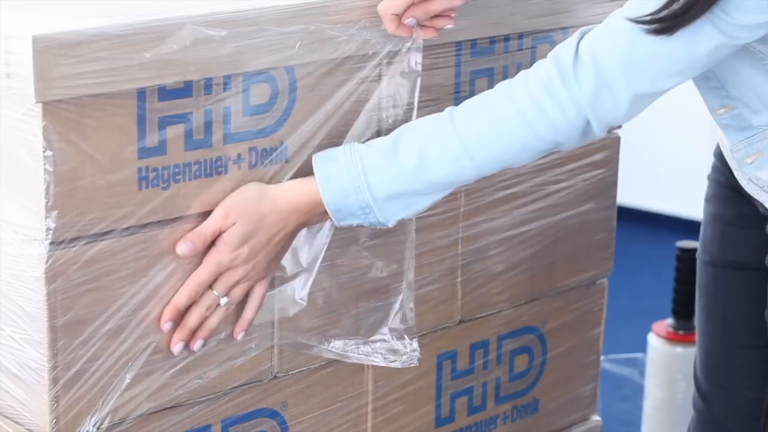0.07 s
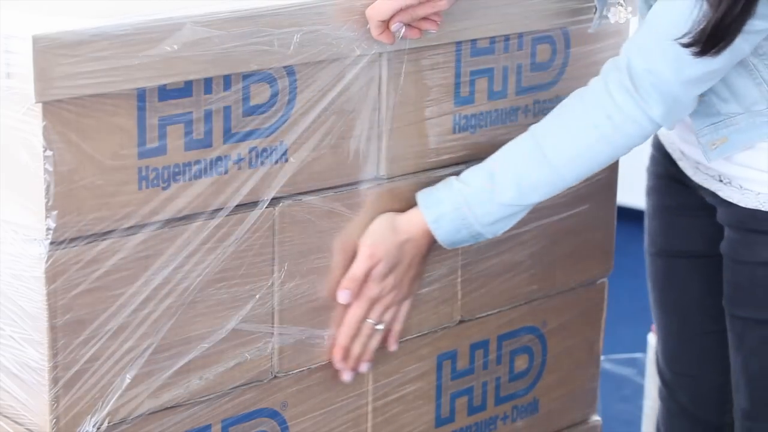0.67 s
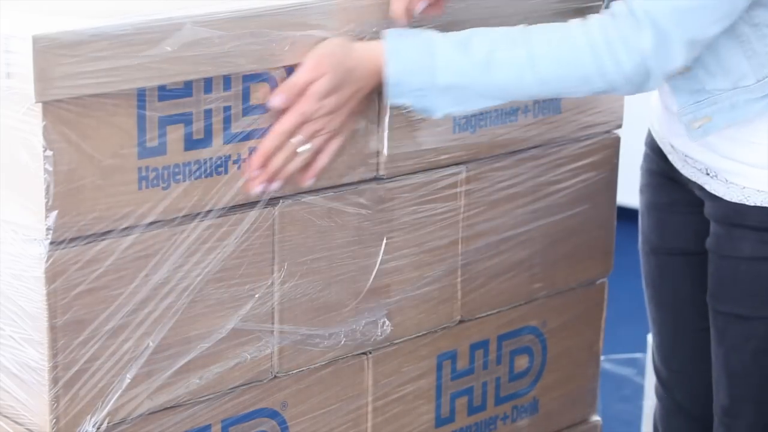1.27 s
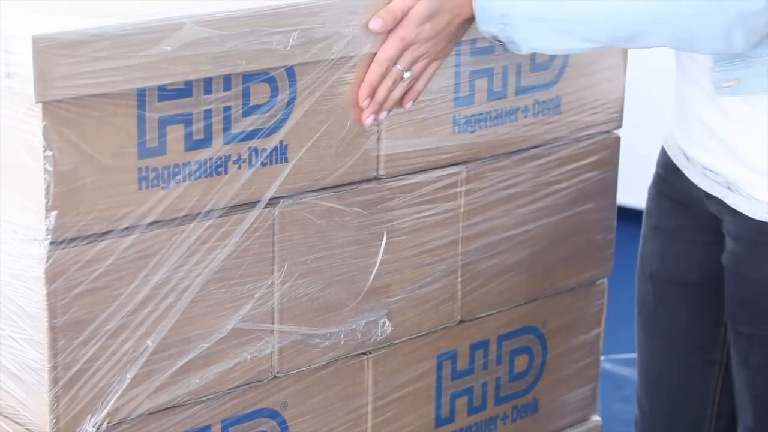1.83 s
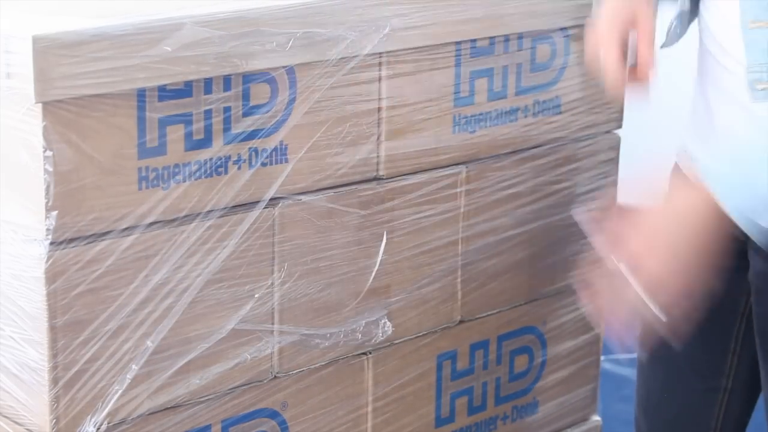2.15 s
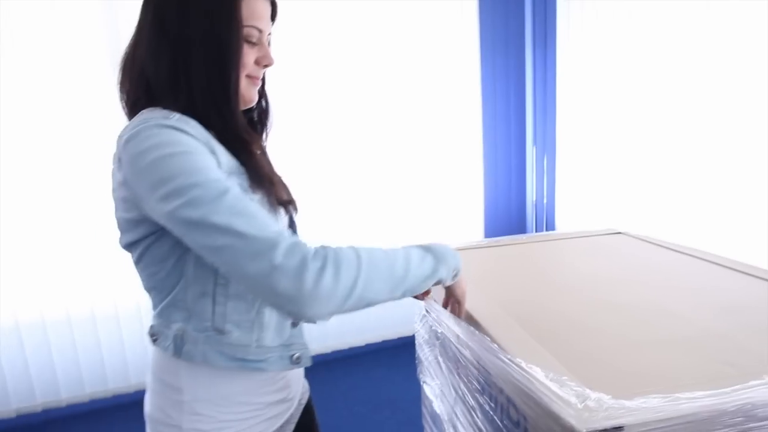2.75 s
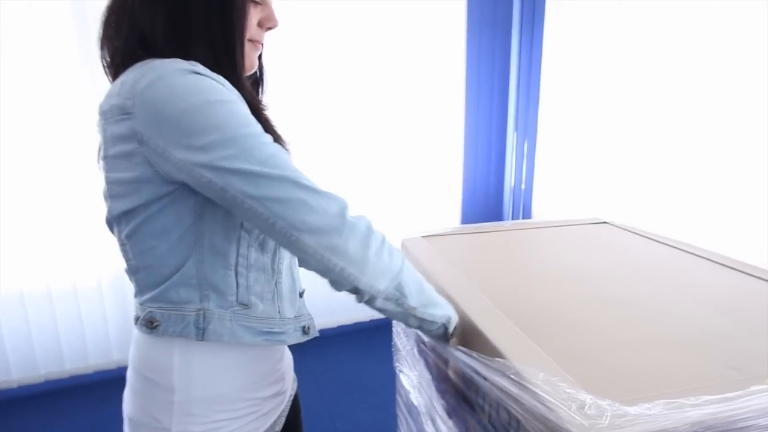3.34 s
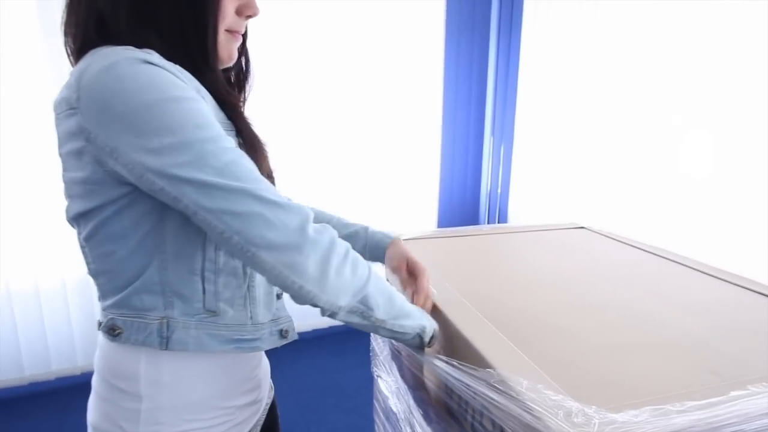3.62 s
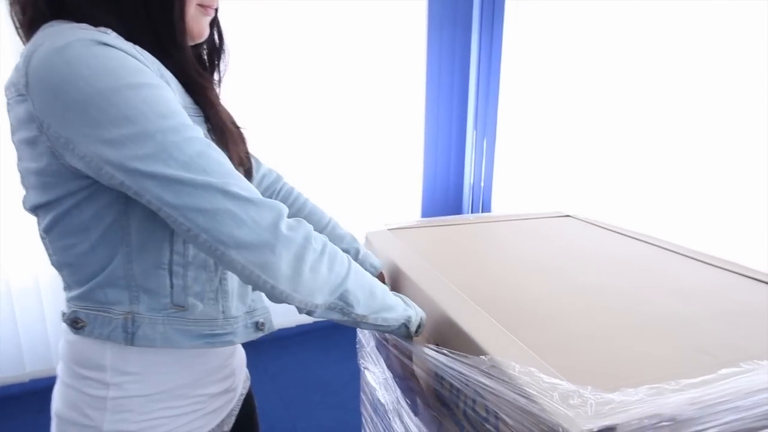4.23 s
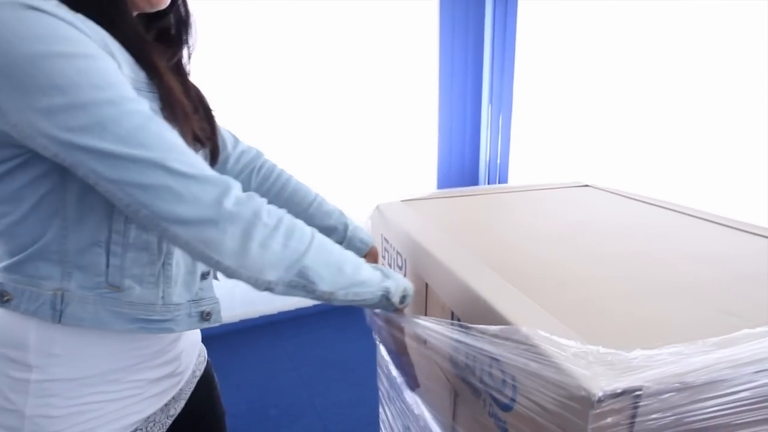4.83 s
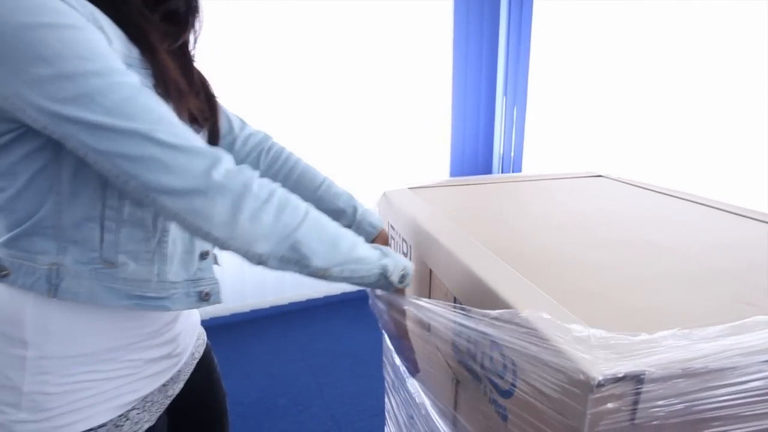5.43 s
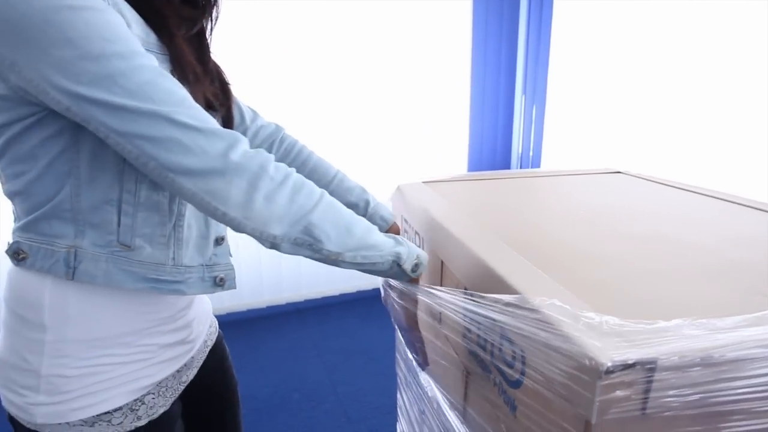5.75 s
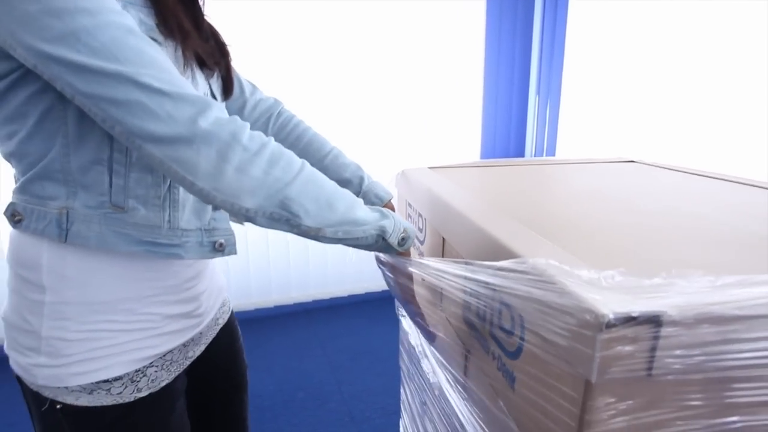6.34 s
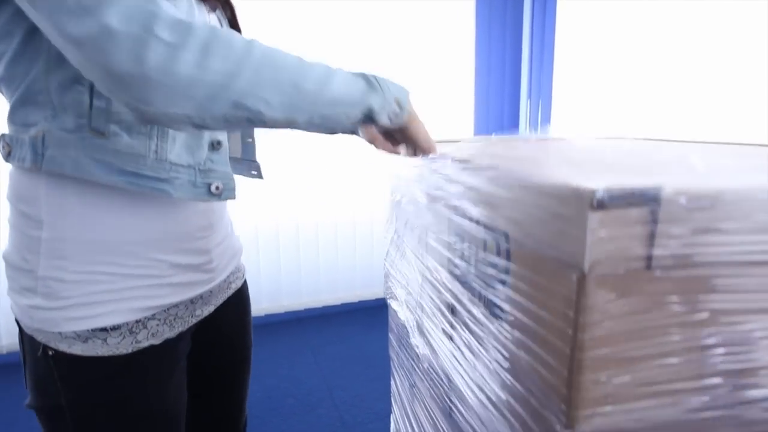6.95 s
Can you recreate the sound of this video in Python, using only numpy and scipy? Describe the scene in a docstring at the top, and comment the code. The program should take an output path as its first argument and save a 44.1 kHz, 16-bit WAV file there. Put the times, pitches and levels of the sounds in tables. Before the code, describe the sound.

Close up in a quiet room with little echo, thin plastic wrap rustles and squeaks as a hand strokes it against a stack of cardboard boxes. It eases briefly, then returns in irregular bright bursts, with creases snapping as it stretches. Hands bump the cardboard now and then, and a last, stronger pull brings loud crackling over a faint low rumble from the boxes.

```python
"""Stretch-wrapping cardboard boxes

In a carpeted room, stretch film is smoothed by hand onto a stack of boxes, then pulled around a corner.
Tiny creases buckle into a crinkle, large ones snap through, and the film squeals where it clings and
slips. The hollow boxes knock under the hands and boom and groan under the pull."""
import sys
import numpy as np
from scipy import signal
from scipy.io import wavfile
from scipy.ndimage import uniform_filter1d

SR = 44100
rng = np.random.default_rng(int(sys.argv[2]) if len(sys.argv) > 2 else 0)


def transcribe(signal):
    """Save signal, clipped to [-1, 1], as a 16-bit WAV file at the path in sys.argv[1]."""
    frames = np.atleast_2d(signal).T
    limited = np.clip(frames, -1, 1)
    pcm = np.round(limited * 32767).astype(np.int16)
    wavfile.write(sys.argv[1], SR, pcm)


N = 307818
TIME = np.arange(N) / SR
BAND_EDGES_HZ = np.geomspace(20, 17000, 28)
BAND_CENTRES_HZ = np.sqrt(BAND_EDGES_HZ[1:] * BAND_EDGES_HZ[:-1])


def from_db(db):
    """Decibels to gain."""
    return 10 ** (np.asarray(db) / 20)


def rms_one(x):
    """Scale to rms 1."""
    return x / np.sqrt(np.mean(x ** 2) + 1e-20)


def in_time(rows):
    """Turn rows of (seconds, values...) into one curve per value, at every sample."""
    times, *columns = np.transpose(rows)
    return [np.interp(TIME, times, column) for column in columns]


def at_hz(points, hz):
    """Read a table along log frequency."""
    freqs, values = np.transpose(points)
    return np.interp(np.log(hz), np.log(freqs), values)


def band(x, index):
    """One band of the filter bank."""
    sos = signal.butter(2, BAND_EDGES_HZ[index:index + 2], "band", fs=SR, output="sos")
    return signal.sosfilt(sos, x + 1e-18)


def resonate(x, hz, width_hz):
    """A resonance with gain 1 at its peak."""
    r = np.exp(-np.pi * width_hz / SR)
    feedback = [1, -2 * r * np.cos(2 * np.pi * hz / SR), r * r]
    return signal.lfilter(np.array([1, 0, -1]) * (1 - r * r) / 2, feedback, x + 1e-18)


def steep_ring(x, hz, width_hz, widen=2):
    """A resonance whose skirts are steepened by a second, wider one."""
    return resonate(resonate(x, hz, width_hz), hz, widen * width_hz)


def ping(hz, width_hz):
    """A single ringing click, peak 1."""
    ring = steep_ring(signal.unit_impulse(1024), hz, width_hz)
    return ring / np.abs(ring).max()


def drift(rate, size=N):
    """Random wander of rms 1 that turns `rate` times a second."""
    steps = np.arange(size)
    return rms_one(np.interp(steps * rate / SR, steps, rng.standard_normal(size)))


def swell(t, crest, hold_s, rise_s, fade_s, curve=1):
    """Envelope that rises 20 dB in rise_s up to the crest, holds, then falls 20 dB in fade_s."""
    away = np.maximum(crest - t, 0) / rise_s + np.maximum(t - crest - hold_s, 0) / fade_s
    return 10 ** -np.minimum(away ** curve, 10)


def add(out, start_s, sound):
    """Mix a sound in at start_s."""
    start = max(round(start_s * SR), 0)
    out[start:start + len(sound)] += sound[:N - start]


# Colour of the room tone. Each row: frequency in Hz, relative spectral density in dB.
ROOM_TONE_COLOUR = [(25, 7.5), (70, 6.5), (120, -1.5), (200, 7), (350, -2), (800, -4), (1800, -1),
                    (3500, -11), (7500, -11), (11000, -21.5), (16000, -14)]


def room_tone(level_db=-71.5):
    """A faint, steady bed of still air."""
    white = rng.standard_normal((2, N))
    bands = (from_db(at_hz(ROOM_TONE_COLOUR, hz)) * band(white[k % 2], k)
             for k, hz in enumerate(BAND_CENTRES_HZ))
    return from_db(level_db) * rms_one(sum(bands))


# Reverb of the carpeted room. Each row: frequency in Hz, seconds to fall 60 dB.
ROOM_DECAY = [(150, .5), (500, 0.63), (1300, 0.27), (3500, 0.26), (8000, 0.15), (16000, 0.14)]
# Echoes off nearby hard surfaces. Each row: delay in seconds, level in dB before the echo_db trim.
EARLY_ECHOES = [(.0048, -7), (.0137, -15), (.0228, -18)]


def room(x, wet_db, echo_db, build_s=0.0015):
    """Direct sound, a few near echoes and a diffuse tail that dies faster in the treble."""
    t = TIME[:SR // 2]
    tail = sum(band(rng.standard_normal(len(t)), k) * from_db(-60 * t / at_hz(ROOM_DECAY, hz))
               for k, hz in enumerate(BAND_CENTRES_HZ))
    tail *= 1 - np.exp(-t / build_s)
    response = from_db(wet_db) * tail / np.sqrt(np.sum(tail ** 2))
    response[0] += 1
    for delay, db in EARLY_ECHOES:
        response[round(delay * SR)] += from_db(db + echo_db)
    return signal.fftconvolve(x, response)[:N]


# Shoves on the stack. Each row: crest and hold in seconds, boom and panel rumble levels in dB.
STACK_SHOVES = [(1.085, 0.069, -75.5, -75.5), (1.725, 0.01, -74, -62.5), (2.791, 0.58, -78, -72.5),
                (3.52, 0.051, -87, -65.5), (3.998, 0.32, -79.5, -86), (4.63, 0.34, -80, -71.5),
                (5.255, 0.073, -79, -67), (5.95, .07, -76, -81), (6.2, 0.3, -65, -59),
                (6.534, 0.056, -62, -64), (6.703, 0.2, -56, -60.5)]


def strain(drag_boom_db=-22, drag_rumble_db=-19):
    """Shoves and the film's drag add in power; gives rows of (seconds, boom dB, rumble dB)."""
    t, level, _, body, *_ = handling().T
    # the drag follows the body of the crinkle
    power = from_db(2 * (level + body + np.array([[drag_boom_db], [drag_rumble_db]])))
    for crest, hold, boom, rumble in STACK_SHOVES:
        envelope = swell(t, crest, hold, rise_s=0.032, fade_s=0.25)
        power += (from_db([[boom], [rumble]]) * envelope) ** 2
    return np.column_stack([t, *10 * np.log10(power)])


def shaken(modes, level_db):
    """Steady drag keeps resonances ringing; the ring is evened out, then rides level_db."""
    drag = rng.standard_normal(N + SR)
    ring = sum(from_db(db) * rms_one(steep_ring(drag, hz, width, widen=4)) for hz, width, db in modes)
    ring = ring[SR:]   # skip the build-up
    return from_db(level_db) * ring / np.sqrt(uniform_filter1d(ring ** 2, size=3000) + 1e-6)


# Resonances of the whole stack, its panels and the deep drone.
# Each row: pitch in Hz, width in Hz, relative level in dB.
STACK_MODES = [(126, 13, 0.5), (152, 22, 6.5)]
PANEL_MODES = [(210, 49, -4), (245, 46, -4), (314, 91, -2.5)]
DRONE_MODES = [(73, 3.7, 0)]
# Fader ride of the drone. Each row: time in seconds, level in dB.
DRONE_RIDE = [(2.6, -105), (2.64, -89), (3.61, -73.5), (4.15, -82), (4.21, -68), (4.54, -75.5),
              (4.67, -103), (4.73, -75), (5.34, -78), (5.62, -100), (6.44, -69), (6.49, -80), (6.8, -55),
              (6.98, -67)]


def boxes(rumble_trim_db=-0.5, drone_trim_db=0.5):
    """Shoves and dragging film shake the hollow stack; a deep drone comes and goes beneath it."""
    boom_db, rumble_db = in_time(strain())
    drone_db, = in_time(DRONE_RIDE)
    boom = shaken(STACK_MODES, boom_db)
    rumble = shaken(PANEL_MODES, rumble_db + rumble_trim_db)
    drone = shaken(DRONE_MODES, drone_db + drone_trim_db)
    return boom + rumble + drone


# Cardboard rubbing under the pull. Each row: crest and hold in seconds, pitch in Hz, level in dB.
BOX_GROANS = [(5.294, 0.13, 153, -69), (6.17, 0.21, 125, -58), (6.705, 0.13, 152.8, -55)]


def groans(waver=0.0293, octave_db=-7.5, unsteady_db=3.0):
    """A wall of the stack slips in regular jerks: a low wavering tone with its octave."""
    out = np.zeros(N)
    for crest, hold, hz, db in BOX_GROANS:
        phase = 2 * np.pi * np.cumsum(hz * (1 + waver * drift(25))) / SR
        tone = sum(np.sin(k * phase) * from_db(octave_db * (k - 1) + unsteady_db * drift(20))
                   for k in (1, 2))
        out += from_db(db) * swell(TIME, crest, hold, rise_s=0.032, fade_s=0.21) * rms_one(tone)
    return out


# Hands bumping the boxes; the 3.7023 s row is a lower ring that follows the knock just before it. # Each row:
# start in seconds, peak in dB, pitch in Hz, width in Hz.
HAND_KNOCKS = [(1.724, -44.5, 510, 450), (3.6976, -27, 1294, 400), (3.7023, -34, 880, 423),
               (6.143, -33.5, 635, 765)]


def knocks():
    """Cardboard gives a hollow knock only a few cycles long."""
    out = np.zeros(N)
    for start, peak_db, hz, width_hz in HAND_KNOCKS:
        add(out, start, from_db(peak_db) * ping(hz, width_hz))
    return out


# Clinging film letting go. Each row: start and length in seconds, first and last pitch in Hz,
# level in dB, roughness (0 is all tone, 1 or more all rasp).
FILM_SLIPS = [(0.217, 0.029, 6450, 7060, -33, 1.1), (0.23, 0.061, 3670, 3930, -37, 0.22),
              (0.246, 0.022, 8360, 9370, -28, 0.1), (0.247, 0.038, 7370, 8100, -32, 0.4),
              (0.264, .013, 10900, 13800, -36, .3), (0.276, 0.02, 5430, 6260, -28, 0),
              (0.318, 0.016, 6250, 6760, -26, 1.1), (0.348, 0.034, 5250, 5430, -35.5, .77),
              (0.349, 0.023, 9100, 10650, -32.5, .85), (0.364, .0165, 2510, 3030, -38, 0.06),
              (0.393, .006, 10730, 11100, -32.5, 0.3), (1.432, 0.011, 15500, 13600, -36, 0),
              (1.445, .0094, 13400, 14900, -34, 0), (1.484, .016, 13400, 10500, -39, .2),
              (1.494, 0.0075, 9100, 7340, -39, .5), (1.518, 0.015, 15400, 10700, -38.5, 0),
              (1.525, 0.025, 2434, 2440, -44.5, 0.06), (1.53, 0.052, 10370, 8800, -40.5, 0.54),
              (1.557, 0.029, 1890, 1647, -52, 0.03), (1.559, 0.026, 3650, 3230, -44.5, 0.76),
              (1.622, .045, 1628, 1860, -51.5, 0.02), (1.629, 0.053, 3640, 3230, -43, 0.42),
              (1.638, 0.037, 8140, 6270, -36, .7), (2.889, 0.043, 1444, 1200, -55.5, 1),
              (3.812, .032, 2005, 1600, -49.5, 0.74), (3.844, 0.026, 1350, 1176, -51.5, 0.6),
              (6.673, .035, 3750, 2870, -40.5, .9), (6.718, 0.058, 1319, 1153, -41, 0.5)]


def squeals(edge_s=0.0012, waver=0.032, unsteady_db=2.0, rasp_width=0.56, overtone_db=-9):
    """Stick-slip: regular slips sing a wavering tone, irregular ones rasp around the same pitch."""
    out, t = np.zeros(N), TIME[:SR // 8]
    for start, length, first_hz, last_hz, db, rough in FILM_SLIPS + side_chirps():
        rough = np.clip(rough, 0, 1)
        centre = (first_hz + last_hz) / 2
        wobble = drift(220, len(t)) + rough * drift(1500, len(t))
        hz = np.interp(t, [0, length], [first_hz, last_hz]) * (1 + waver * wobble)
        phase = 2 * np.pi * np.cumsum(hz) / SR
        tone = sum(np.sin(k * phase) * from_db(overtone_db * np.log2(k) + at_hz(FILM_COLOUR, k * centre))
                   for k in range(1, 5) if k * centre < SR / 2)
        rasp = steep_ring(rng.standard_normal(len(t)), centre, centre * rasp_width)
        voice = np.sqrt(1 - rough) * rms_one(tone) + np.sqrt(rough) * rms_one(rasp)
        grip = rms_one(from_db(unsteady_db * drift(600, len(t))))
        gate = np.clip(t / edge_s, 0, 1) * np.clip((length + edge_s - t) / edge_s, 0, 1)
        add(out, start, from_db(db) * gate * grip * voice)
    return out


def side_chirps(per_slip=2, length_s=0.008, relative_db=-12, glide=0.13, rough=0.45):
    """Each slip tears nearby patches loose, chirping at their own pitches; rows like FILM_SLIPS."""
    rows = []
    for start, length, hz, _, db, _ in FILM_SLIPS:
        for when, pitch, bend in rng.random((per_slip, 3)):
            first_hz = hz * (0.75 + 0.75 * pitch)
            last_hz = first_hz * (1 + glide * (2 * bend - 1))
            rows.append((start + when * length, length_s, first_hz, last_hz, db + relative_db, rough))
    return rows


# Large creases snapping through. Each row: start in seconds, peak in dB, ring pitch in Hz,
# body in dB relative to the ring.
CREASE_SNAPS = [(0.2144, -18, 5930, -14.5), (0.5373, -32, 5940, 0), (0.7976, -32.5, 6600, -12),
                (0.8591, -24, 5830, 2), (1.0003, -36, 6950, -11), (1.283, -22.5, 8100, -12),
                (1.3493, -27, 6500, -21), (1.8875, -25.5, 6500, -11), (1.8991, -21.5, 6160, -11),
                (2.0233, -35, 6360, -24), (2.058, -51, 10330, -17), (2.302, -33, 6900, -12),
                (2.3211, -29.5, 6200, -6.5), (2.617, -46, 6940, -7), (2.6865, -36.5, 6460, -24),
                (2.7914, -28.5, 7940, -7), (2.8397, -26.5, 8200, -8), (2.9096, -29, 7600, -7),
                (2.9662, -26, 6700, -32), (3.0368, -24.5, 7900, -13), (3.0627, -16.5, 6700, -7),
                (3.0735, -25.5, 7300, -12), (3.1219, -26.5, 6900, -4), (3.26, -33, 7260, -14),
                (3.3144, -27.5, 5870, -10), (3.4304, -29, 6700, -23), (3.6514, -36, 6070, -11),
                (4.1119, -24, 6150, -19), (4.196, -34, 6350, -25), (4.289, -33, 5800, 3),
                (4.327, -38.5, 6500, -25), (4.571, -26.5, 7700, -13), (4.5758, -24, 5700, -11.5),
                (4.7183, -20, 7140, -8), (4.866, -39, 6600, -5), (4.9844, -36, 5500, -21),
                (5.031, -41.5, 8900, -26), (5.2213, -40, 5900, -26), (5.5158, -37, 7740, -23),
                (5.6247, -39.5, 6570, -25), (5.9297, -20.5, 7700, -21), (6.012, -25, 7200, -21),
                (6.021, -23.5, 7200, -22), (6.1117, -23, 6700, -18), (6.1431, -18, 8400, -25),
                (6.4417, -27, 6100, -4), (6.4917, -24.5, 6100, -10), (6.531, -23.5, 5670, 0.5),
                (6.582, -31.5, 5900, -2), (6.617, -23.5, 5400, -21), (6.638, -20, 4960, -6),
                (6.7958, -12.5, 7200, -10.5), (6.831, -15.5, 5300, -7), (6.9688, -22.5, 5700, -24)]


def snaps(crack_db=-12, settle_per_s=2500, settle_db=-17, settle_s=0.0056):
    """A crease flips with a sharp click, and its neighbours settle just after it."""
    out, t = np.zeros(N), TIME[:SR // 20]
    crack, body = ping(10170, width_hz=3000), ping(1900, width_hz=1500)
    for start, peak_db, hz, body_db in CREASE_SNAPS + small_snaps():
        flips = (rng.random(len(t)) < settle_per_s / SR) * rng.standard_normal(len(t))
        flips *= from_db(settle_db) * np.exp(-t / settle_s)
        flips[0] = 1   # the main flip
        click = ping(hz, width_hz=2300) + from_db(crack_db) * crack - from_db(body_db) * body
        add(out, start, from_db(peak_db) * signal.fftconvolve(flips, click / np.abs(click).max()))
    return out


def small_snaps(per_s=13, above_db=16, spread_db=3.5, ring_hz=7000, body_db=-17, candidates=400):
    """Lesser creases pop out of the crinkle at random, softer as it slides; rows like CREASE_SNAPS."""
    t, level, rub, *_ = handling().T
    when, chance = rng.random((candidates, 2)).T
    size, pitch, depth = rng.standard_normal((3, candidates))
    starts = when * TIME[-1]
    peak_db = np.interp(starts, t, level - 6 * rub) + above_db + spread_db * size
    rows = np.column_stack([starts, peak_db, ring_hz * np.exp(0.13 * pitch), body_db + 5 * depth])
    return list(rows[chance < per_s * TIME[-1] / candidates])


# Strokes and tugs of the hand, each a swell of crinkle. Each row: crest in seconds, level at 5-10 kHz
# in dB, rise and fade in seconds per 20 dB, body and sheen in relative dB, share of smooth rub (0-1).
HAND_STROKES = [(0.114, -59.5, 0.28, 0.066, -16, -12.5, 0.14), (0.24, -55, 0.15, 1, -8.5, -19.5, .2),
                (0.51, -51.5, 0.47, 0.41, -22.5, -9.5, 0.87), (0.861, -51, 0.073, 0.092, -6.5, -7, 0.7),
                (1.1, -56.5, 0.033, 0.35, -12, -9, 0.56), (1.26, -53, 0.24, 0.37, -15.5, -13, .4),
                (1.42, -53.5, 0.33, 0.48, -12.5, -8, 0.32), (1.67, -45.5, 0.36, 0.091, -17.5, -11, 0.55),
                (1.905, -47, 0.13, 0.088, -9, -19, .6), (2.035, -67, .02, 0.24, -2, -10, .4),
                (2.325, -68, 0.11, 0.19, -1, -18, 0.57), (2.714, -55.5, 0.012, 0.13, -11.5, -14, 0.3),
                (2.805, -52, .03, 0.28, -9.5, -9, 0.24), (2.925, -54.5, 0.087, 0.24, 0.5, -4, 0.18),
                (3.08, -49.5, 0.083, 0.057, 0.5, -5, .6), (3.135, -47, 0.11, 0.15, -14, -20, 0.86),
                (3.24, -55.5, 0.11, 0.07, -2, -7.5, 0.45), (4.97, -59, 0.27, .12, -11.5, -10, 0.35),
                (6.04, -50, 0.24, 0.25, -12.5, -3.5, 0.18), (3.435, -52, 0.2, 0.15, -15, -9, 0.26),
                (3.52, -42, 0.054, 0.061, -11, -10, 0.59), (3.655, -58.5, .1, 0.67, -11, -14, 0.11),
                (3.835, -54, 0.078, 0.16, 4.5, -25, 0.83), (3.97, -55, 0.26, 0.16, -14, -10.5, 0.93),
                (4.135, -62, 0.054, 0.14, 1, -10, 0.15), (4.264, -64, 0.06, 0.26, -1.5, -8, .1),
                (4.595, -48.5, 0.037, 0.21, -22, -4.5, 0.28), (4.727, -38, 0.17, 0.1, -11, -8.5, 0.49),
                (4.82, -49.5, 0.15, 0.11, -5, -11, 0.82), (5.257, -44, 0.1, 0.11, -9.5, -7, 0.28),
                (5.46, -56.5, 0.22, 0.26, -9, -5, 0.21), (5.82, -54.5, .11, 0.19, -14, -8, 0.32),
                (5.89, -51.5, 0.041, .15, -7.5, -4, 0.48), (5.937, -44.5, 0.072, 0.14, -20, -8, .26),
                (6.155, -46.5, 0.021, 0.14, -11.5, -20, 0.48), (6.33, -56, 0.077, 0.23, -5, -7, 0.1),
                (6.499, -49, 0.093, 0.26, -1, -8, 0.36), (6.682, -44, 0.015, 0.12, -10, -10, 0.81),
                (6.745, -35, 0.13, 0.22, -6, -12.5, 0.8), (6.961, -42.5, 0.093, 0.13, -15.5, -8.5, 0.29)]


def handling(rest_db=-81.5, rest_body_db=-4, rest_sheen_db=-13, rest_rub=0.18):
    """Strokes add in power; gives rows of (seconds, level dB, rub, relative body, rasp, sheen dB)."""
    t = TIME[::64]
    resting = np.full(len(t), from_db(2 * rest_db))   # between strokes the taut film ticks faintly
    # a curve above 1 rounds the crest and shortens the tail
    strokes = [(from_db(db) * swell(t, crest, 0, rise, fade, curve=1.22)) ** 2
               for crest, db, rise, fade, *_ in HAND_STROKES]
    powers = np.array([resting] + strokes)
    total = powers.sum(axis=0)
    shares = powers / total
    textures = [(rest_body_db, rest_sheen_db, rest_rub)] + [row[-3:] for row in HAND_STROKES]
    body, sheen, rub = np.transpose(textures)
    rasp = 0.53 * body - 0.8   # film pressed on cardboard gains rasp along with body
    colours = [10 * np.log10(from_db(2 * db) @ shares) for db in (body, rasp, sheen)]
    return np.column_stack([t, 10 * np.log10(total), np.clip(rub, 0, 1) @ shares, *colours])


# Base colour of the film. Each row: frequency in Hz, relative spectral density in dB.
FILM_COLOUR = [(200, -18), (330, -15), (470, -10), (680, -7), (950, -8), (1250, -4.5), (2100, -4),
               (3200, 1.5), (4500, 2), (6200, 4), (8200, 4), (10000, -19), (13000, -16.5), (16000, -27.5)]
# The crinkle's registers: main, body, rasp and sheen. Each row: low and high edge in Hz.
FILM_REGISTERS = [(5000, 10000), (400, 2200), (2200, 5000), (10000, 16000)]


def crinkle(creases_per_s=620, size_db=4.0, clump_db=4.0, flutter_db=3.0, patchy_db=2.0):
    """Countless tiny creases buckle in clumps; sliding blurs them into a rub."""
    level, rub, *register_db = in_time(handling())
    buckles = rng.random(N) < creases_per_s * from_db(clump_db * drift(90)) / SR
    sizes = from_db(size_db * np.minimum(rng.exponential(1, N), 3.2))
    creases = rms_one(buckles * sizes)
    sliding = from_db(flutter_db * drift(250))
    force = np.sqrt((1 - rub) * creases ** 2 + rub * sliding ** 2) * from_db(level)
    # slack film speaks in the high registers, film pressed on cardboard in the low ones
    base_db = [10 * np.log10(np.sum(from_db(at_hz(FILM_COLOUR, np.arange(low, high))) ** 2))
               for low, high in FILM_REGISTERS]
    lifts_db = np.array([np.zeros(N)] + register_db) - np.array(base_db)[:, None]
    middles = np.log(FILM_REGISTERS).mean(axis=1)
    rising = np.argsort(middles)
    out = np.zeros(N)
    for k in np.flatnonzero(BAND_CENTRES_HZ > FILM_COLOUR[0][0]):
        hz = BAND_CENTRES_HZ[k]
        crossfade = np.array([np.interp(np.log(hz), middles[rising], row[rising]) for row in np.eye(4)])
        colour = from_db(at_hz(FILM_COLOUR, hz) + crossfade @ lifts_db)
        wander = rms_one(from_db(patchy_db * drift(45)))   # the free spans of film keep changing size
        out += band(force * rng.standard_normal(N) * colour * wander, k)
    return out * np.sqrt(SR / 2)


def scene():
    """Film and boxes in the room; the crinkle's near echoes are faint."""
    rustle = room(crinkle(), wet_db=-10.5, echo_db=-23)
    clicks = room(snaps(), wet_db=-9, echo_db=-2)
    cling = room(squeals(), wet_db=-6, echo_db=-18.5)
    cardboard = room(knocks(), wet_db=-4, echo_db=-3) + boxes() + groans()
    return (rustle + clicks + cling + cardboard + room_tone())[None]


def record(dry, presence_hz=8400, presence_mix_db=-4, cutoff_hz=16000, gain_db=-1.5):
    """The microphone adds a narrow presence peak; the top is cut steeply."""
    bright = dry + from_db(presence_mix_db) * resonate(dry, presence_hz, width_hz=1100)
    high_cut = signal.ellip(10, 0.2, 70, cutoff_hz, fs=SR, output="sos")
    return signal.sosfilt(high_cut, from_db(gain_db) * bright)


dry = scene()
out = record(dry)
transcribe(out)
```